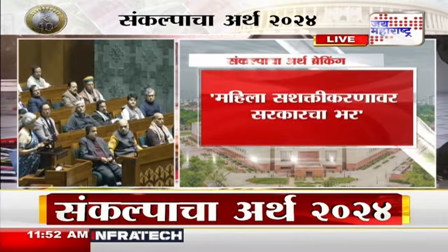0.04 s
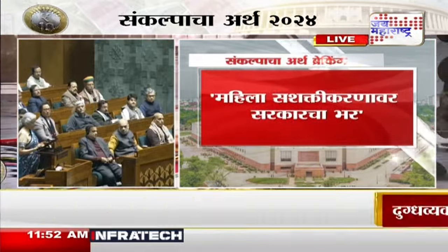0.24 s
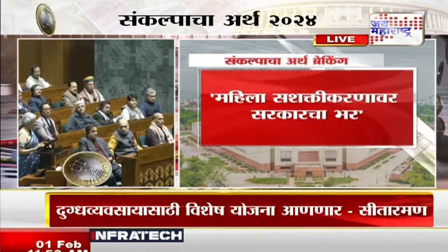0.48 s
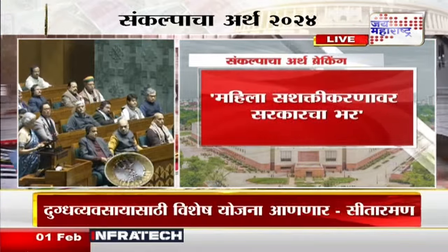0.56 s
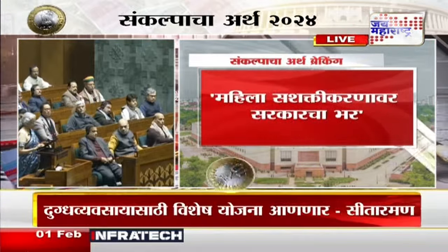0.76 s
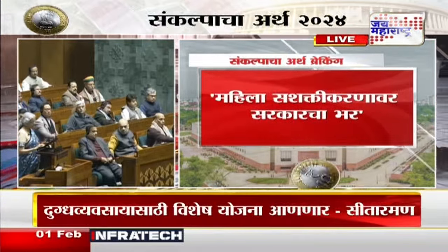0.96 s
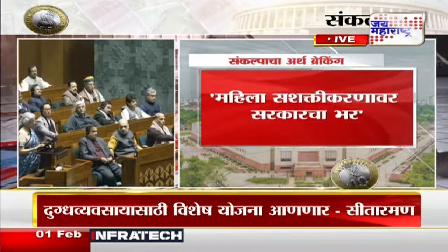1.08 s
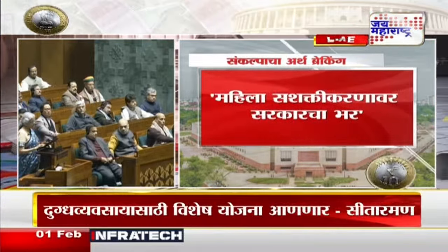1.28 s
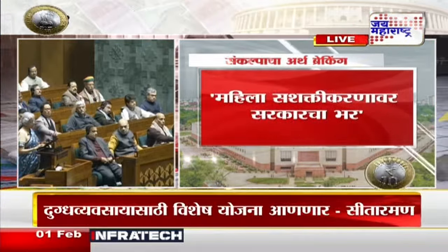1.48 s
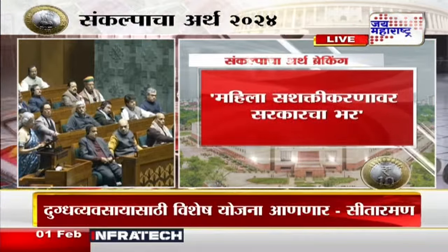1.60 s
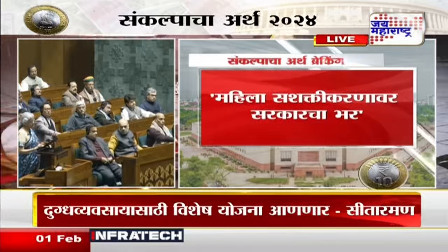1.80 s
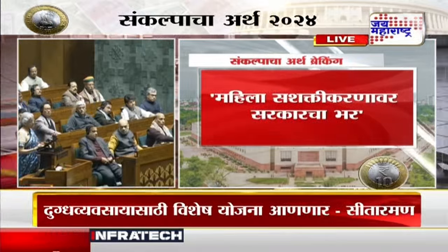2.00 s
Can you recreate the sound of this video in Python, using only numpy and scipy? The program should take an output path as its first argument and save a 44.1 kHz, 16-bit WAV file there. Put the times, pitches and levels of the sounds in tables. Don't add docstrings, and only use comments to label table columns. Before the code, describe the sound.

Open palms thump wooden desks in a large chamber from the start, irregular and overlapping. Near slaps crack with short woody rings and faint wall echoes over a dense patter of dull distant thumps. From about 1.2 s the booms grow heavier; very sharp slaps stand out at 1.42 and 2.03 s. The broadcast sound dips for a few milliseconds near 1.57 s. Low hall rumble underneath.

```python
import sys
import numpy as np
from scipy import signal
from scipy.fft import rfft, irfft, next_fast_len
from scipy.io import wavfile
from scipy.ndimage import uniform_filter1d, map_coordinates

SR = 44100
rng = np.random.default_rng(int(sys.argv[2]) if len(sys.argv) > 2 else 0)


def how_loud(loudness_db):
    steps = np.asarray(loudness_db, float) / 20
    return 10 ** steps


def log_audio(samples):
    frames = np.atleast_2d(samples).T
    limited = np.clip(frames, -1, 1)
    pcm = np.round(limited * 32767).astype(np.int16)
    wavfile.write(sys.argv[1], SR, pcm)


N = 90272


def unit(x):
    return x / np.sqrt(np.mean(x ** 2) + 1e-20)


def along(points, hz):
    f, v = np.transpose(points)
    return np.interp(np.log(hz + 1), np.log(f + 1), v)


def filtered(x, response):
    m = next_fast_len(len(x) + 8192)
    return irfft(rfft(x, m) * response(np.fft.rfftfreq(m, 1 / SR)), m)[:len(x)]


def delayed(delay_s, gain_db):
    return lambda f: how_loud(gain_db) * np.exp(-2j * np.pi * f * delay_s)


def placed(s, rows):
    at = np.round(np.asarray(s) * SR).astype(int)[:, None] + np.arange(rows.shape[1])
    return np.bincount(at.ravel(), rows.ravel(), N + SR)[:N]


def ring(hz, t60, rise, size):
    t = np.arange(size) / SR
    return np.sin(2 * np.pi * hz[:, None] * t) * how_loud(-60 * t / t60) * (1 - np.exp(-t / rise))


def unsteady(rows, depth, smooth):
    return rows * (1 + depth * unit(uniform_filter1d(rng.standard_normal(rows.shape), size=smooth, axis=1)))


def booms():
    # start in seconds, peak level in dB, panel pitch in Hz.
    near_booms = [(0, -36, 249), (0.125, -38, 375), (0.132, -30, 261), (0.163, -34.5, 265),
                  (0.469, -32.5, 444), (0.523, -36, 257), (0.581, -34, 320), (0.625, -37.5, 344),
                  (0.682, -31.5, 447), (0.736, -40, 334), (0.774, -32.5, 194), (0.791, -33, 404),
                  (0.795, -28, 204), (0.853, -32, 310), (0.869, -30, 402), (0.886, -30, 257),
                  (1.045, -30, 262), (1.154, -28.5, 329),
                  (1.157, -29.5, 146), (1.162, -29, 496), (1.268, -27, 349), (1.323, -28.5, 250),
                   (1.42, -25.5, 277), (1.473, -31.5, 186), (1.492, -28.5, 258), (1.529, -23, 264),
                   (1.567, -33, 278), (1.606, -28, 220), (1.61, -30, 387), (1.759, -22.5, 266.4),
                   (1.874, -34, 280), (1.88, -26, 410), (1.898, -26, 259), (1.937, -29, 284),
                   (1.959, -31, 337), (2.027, -32, 427)]
    s, db, hz = np.transpose(near_booms)
    boom_s = 0.061
    panel = ring(hz, boom_s, 0.0087, size=4000)
    panel = panel + 0.25 * ring(1.662 * hz, 0.67 * boom_s, 0.005, size=4000)
    return placed(s, how_loud(db + 4.5)[:, None] * unsteady(panel, 0.5, 200))


def desk_top(f):
    # centre in Hz, width in Hz, level in dB.
    wood_rings = [(5600, 670, 4), (7900, 360, 4.5), (10500, 2700, -2), (13300, 1200, -32),
                  (16800, 4400, -11)]
    total = 0
    for k, (centre, width, db) in enumerate(wood_rings):
        sign = (-1) ** k
        total = total + sign * how_loud(db) * 1j * f * width / (centre ** 2 - f ** 2 + 1j * f * width)
    return total


def slaps():
    # start in seconds, peak level in dB, palm ring in Hz, crack level over the ring in
    # dB, snap pitch in Hz.
    near_slaps = [(0.0004, -26, 2010, -8, 8080), (0.0672, -39.5, 1990, -3, 11000), (0.1118, -26, 2100, -8, 8350),
                  (0.1196, -25, 1930, -0.5, 8000), (0.2006, -26.5, 1650, -6, 12000),
                  (0.2627, -26.5, 3470, -35, 6600), (0.273, -42, 3630, -21, 11600),
                  (0.2929, -30.5, 2640, -6, 7260), (0.4699, -23.5, 2600, -2.5, 13300),
                  (0.494, -33.5, 2210, 0.5, 8640), (0.5662, -28, 1890, -5, 9300),
                  (0.5905, -28.5, 2940, -4, 7960), (0.6227, -29, 3570, 0.5, 8660),
                  (0.6312, -27.5, 2560, -7, 6900), (0.7018, -21, 4070, -6, 10600), (0.765, -33, 3770, -13, 6600),
                  (0.7736, -26, 3770, -16, 6600), (0.8018, -25, 2500, -7, 7260), (0.8476, -22.5, 2320, 0, 8260),
              (0.971, -41, 2080, 5.5, 7400), (0.98, -35.5, 2550, 3.5, 6650), (1.076, -34, 1620, 2.5, 9300),
              (1.0986, -26, 5370, 9, 9200), (1.111, -31.5, 3560, 1, 8560), (1.1342, -26, 2240, 2.5, 10500),
              (1.1625, -25, 2500, 2, 7750), (1.171, -27.5, 3720, -5, 10900), (1.1789, -29.5, 2290, 0, 8400),
              (1.1898, -35.5, 3430, 4, 13300), (1.2485, -35, 2240, 4.5, 7000),
              (1.3001, -34, 5730, 9.5, 11400), (1.3248, -26, 1650, -18, 7400),
              (1.3772, -41, 1860, 6.5, 9000),
                  (1.4106, -33, 1760, -20, 8830), (1.4222, -11, 2950, -5.5, 7830), (1.4909, -30, 2550, 2.5, 7800),
            (1.498, -25, 2110, -8, 8790), (1.5178, -26.5, 1480, -0.5, 7900),
            (1.5272, -31.5, 4080, 7.5, 9470), (1.588, -34, 3300, 3.5, 9300), (1.728, -29.5, 5420, 7, 8360),
            (1.751, -24.5, 1890, 1, 9140), (1.773, -31, 2520, 2.5, 7900), (1.825, -37.5, 3100, 10, 8640),
            (1.934, -40, 1540, 8.5, 8450), (1.99, -35, 2400, 3.5, 8300), (2.0321, -12, 3030, -3, 7880)]
    s, db, hz, crack_db, snap_hz = np.transpose(near_slaps)
    ring_s, crack_s, snap_s, rise_s, tail_s = 0.01, 0.0052, 0.0055, 0.00046, 0.061
    t = np.arange(1600) / SR
    noise = rng.standard_normal((len(s), 4, len(t)))
    rough = 1 + uniform_filter1d(noise[:, 2:], size=12, axis=2)

    flat = hz[:, None] < 3200
    modes = 0
    for ratio, gain in [(0.997, 0.82), (0.8, 0.5 * flat), (0.5795, 0.31 * flat), (1.314, 0.5 * ~flat)]:
        modes = modes + gain * ring(ratio * hz, ring_s, rise_s, size=1600)
    contact = 1 - np.exp(-(t / 0.00028) ** 2)
    palm = placed(s, how_loud(db - 0.5)[:, None] * rough[:, 0] * modes * contact)

    crack_level = how_loud(db + crack_db + 10.5)[:, None]
    snap_rows = rough[:, 1] * ring(snap_hz, snap_s, rise_s, size=1600)
    snap = placed(s, crack_level * how_loud(-12) * snap_rows)
    burst = how_loud(-60 * t / crack_s) * (1 - np.exp(-(t / 0.0011) ** 2))
    crack = filtered(placed(s, crack_level * noise[:, 0] * burst), desk_top) + snap

    hard = how_loud(np.clip(0.34 * (db + 27), -20, 0))[:, None]
    finger_crack = filtered(placed(s, hard * crack_level * noise[:, 1] * burst), desk_top)
    fingers = filtered(finger_crack + 0.4 * palm, delayed(0.0032, -7))

    wall = delayed(0.0188, -13)
    echo = filtered(crack + 0.51 * palm + 0.4 * fingers, lambda f: wall(f) / (1 + (3800 / (f + 1)) ** 4))
    rattle = placed(s, how_loud(db - 13)[:, None] * how_loud(-60 * t / tail_s) * noise[:, 3])
    rattle = filtered(rattle, lambda f: f / (f + 900) / (1 + (f / 5000) ** 2))
    return palm + crack + fingers + echo + rattle


def hall_colour(f):
    # pitch in Hz, level in dB per Hz.
    wash_curve = [(15, -45), (25, 1), (43, -12.5), (244, -0.5), (597, -8.5), (3390, -17), (10600, -28),
                  (13900, -38.5), (16400, -37)]
    return how_loud(along(wash_curve, f))


def far_thumps():
    u = rng.random((int(220 * N / SR), 2))
    pitch = np.clip(320 * np.exp(0.432 * rng.standard_normal(len(u))), 140, 900)
    rows = ring(pitch, 11 / pitch[:, None], 0.00037, size=4000)
    return unit(placed(u[:, 0] * N / SR, how_loud(9 * u[:, 1:]) * rows))


def far_slaps():
    v = rng.random((int(130 * N / SR), 3))
    t = np.arange(500) / SR
    burst = rng.standard_normal((len(v), len(t))) * how_loud(-60 * t / 0.024)
    burst = burst + 0.66 * ring(1200 * 4 ** v[:, 2], 0.035, 0.0044, size=500)
    pats = placed(v[:, 0] * N / SR, how_loud(11 * v[:, 1:2]) * burst)
    return unit(filtered(pats, lambda f: hall_colour(f) / (1 + (900 / (f + 1)) ** 2) / (1 + f / 9000)))


def rumble(effort):
    noise = filtered(rng.standard_normal(N), lambda f: 1 / (1 + (np.log((f + 1) / 78.5) / 0.27) ** 4))
    return how_loud(-15.5) * effort * unit(noise)


def crowd():
    # time in seconds, boom level in dB, slap level in dB.
    effort = [(0.0, -41, -66), (0.06, -47, -60), (0.13, -44.5, -55.5), (0.27, -45.5, -55), (0.44, -46, -55),
              (0.5, -43, -58), (0.57, -41.5, -55.5), (0.69, -40.5, -55), (0.79, -40, -52),
              (0.93, -44.5, -54), (1.05, -40.5, -54.5), (1.18, -38, -51), (1.38, -40.5, -53),
              (1.5, -35.5, -51), (1.67, -39, -48), (1.85, -36.5, -53), (2.05, -42, -53)]
    s, boom_db, slap_db = np.transpose(effort)
    t = np.arange(N) / SR
    boom = how_loud(np.interp(t, s, boom_db))
    slap = how_loud(np.interp(t, s, slap_db))
    wash = unit(filtered(rng.standard_normal(N), hall_colour))
    low = filtered(wash, lambda f: 1 / (1 + (f / 800) ** 2))
    swell_db = map_coordinates(rng.standard_normal(40), [t * 14])
    dull = boom * (how_loud(-2.5) * far_thumps() + how_loud(-3.5) * low)
    bright = slap * (how_loud(-1.5) * far_slaps() + how_loud(7 + swell_db) * (wash - low))
    return dull + rumble(boom) + bright


def hall(x):
    # pitch in Hz, time to fall 60 dB in seconds.
    fading = [(150, 0.47), (1000, 0.98), (4000, 0.27), (12000, 0.48)]
    hz, t, z = signal.stft(rng.standard_normal(SR // 2), SR, nperseg=256)
    tail = signal.istft(z * how_loud(-60 * t / along(fading, hz)[:, None]), SR, nperseg=256)[1]
    return signal.fftconvolve(np.pad(x, (300, 0)), tail / np.linalg.norm(tail))[:N]


def ticks():
    # start in seconds, peak level in dB, pitch in Hz.
    short_rings = [(0.1206, -30, 4610), (0.1468, -37, 3720), (0.199, -37, 3620), (0.2005, -36, 14400),
                   (0.2179, -39, 3800), (0.26, -40, 4300), (0.372, -44, 5700), (0.4692, -34, 3380),
                   (0.468, -45, 5970), (0.6566, -38, 3100), (0.701, -29, 4520), (0.701, -30, 5230),
                   (0.7195, -35, 4740), (0.8018, -33, 5830), (0.85, -28.5, 6050), (0.8483, -37, 3980),
                   (0.9318, -44, 3950), (1.003, -34, 9000), (1.069, -34, 8300), (1.069, -44, 2740),
                   (1.078, -35, 11500), (1.097, -30.5, 3840), (1.099, -30, 4600), (1.1175, -28, 8600),
                   (1.1345, -35, 4800), (1.164, -38.5, 13300), (1.2346, -49, 3350), (1.4237, -19, 3006),
                   (1.424, -21, 10700), (1.5105, -30.5, 3350), (1.574, -42, 3220), (1.7283, -28, 5390),
                   (1.7506, -36, 3790), (1.8255, -35, 9250), (1.8113, -46, 3370), (1.8477, -39, 3300),
                   (1.8816, -39, 3400), (1.9165, -40, 3740), (1.9906, -36, 6000), (2.032, -26, 1754),
                   (2.033, -21, 5580), (2.0355, -15, 10500)]
    s, db, hz = np.transpose(short_rings)
    rows = ring(hz, 36 / hz[:, None], 0.00086, size=900)
    return placed(s, how_loud(db + 5)[:, None] * unsteady(rows, 0.54, 20))


def cupped_knocks():
    # start in seconds, peak level in dB, pitch in Hz.
    knocks = [(0.122, -35, 882), (0.469, -33.5, 870), (1.179, -35.5, 720), (2.033, -37.5, 880)]
    s, db, hz = np.transpose(knocks)
    return placed(s, how_loud(db + 5.5)[:, None] * ring(hz, 0.032, 0.00023, size=2000))


def desk_frames():
    # start in seconds, peak level in dB, pitch in Hz.
    deep_booms = [(0.123, -38, 160), (0.14, -44, 81), (0.275, -37.5, 245), (0.47, -34.5, 186),
                  (0.5, -36, 118), (0.704, -34.5, 106), (0.821, -29, 190), (0.861, -35, 190),
                  (0.9, -37, 218), (0.84, -36, 70.5), (0.951, -38, 79), (1.105, -41, 82), (1.2, -30, 145),
                  (1.395, -31.5, 195.4), (1.431, -28, 184), (1.515, -32, 188), (1.52, -33, 129),
                  (1.77, -23.5, 173), (1.797, -36, 161), (1.8, -44, 73.5), (1.965, -33, 171),
                  (2.026, -34, 183)]
    s, db, hz = np.transpose(deep_booms)
    return placed(s, how_loud(db + 3.5)[:, None] * ring(hz, 0.1, 0.014, size=6000))


def scene():
    near = slaps() + ticks() + booms() + cupped_knocks() + desk_frames()
    return (near + how_loud(-20.5) * hall(near) + crowd())[None]


def starved(x):
    # start in seconds, end in seconds, lowest lost pitch in Hz.
    treble_gaps = [(.245, .272, 14000), (.458, .467, 14600), (.474, .49, 14800), (.606, .62, 13200),
                   (.705, .712, 14800), (.836, .846, 14500), (1.102, 1.115, 14800), (1.428, 1.437, 14000),
                   (2.02, 2.029, 14000)]
    t = np.arange(N) / SR
    lost = 0
    for start, end, hz in treble_gaps:
        gate = uniform_filter1d(((t > start) & (t < end)) * 1.0, size=90)
        lost = lost + gate * filtered(x, lambda f: f > hz)
    return x - lost


def link_band(f):
    top = how_loud(-8 * np.clip((f - 15000) / 1000, 0, 2)) * (f < 16000)
    return top * (0.16 + 0.89 / (1 + (58 / (f + 1)) ** 6))


def low_pass(x):
    return signal.sosfilt(signal.butter(12, 16500, fs=SR, output="sos"), x)


def record(dry):
    t = np.arange(N) / SR
    drop_from_s, drop_to_s, fade_s = 1.5622, 1.5707, 0.0008
    gap = np.clip(np.minimum(t - drop_from_s, drop_to_s - t) / fade_s, 0, 1)
    sent = starved(filtered(dry[0], link_band)) * how_loud(-18 * gap)
    return low_pass(sent[None] - 0.001)


dry = scene()
out = record(dry)
log_audio(out)
```